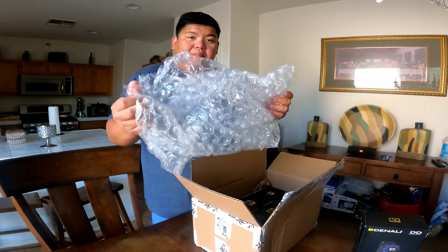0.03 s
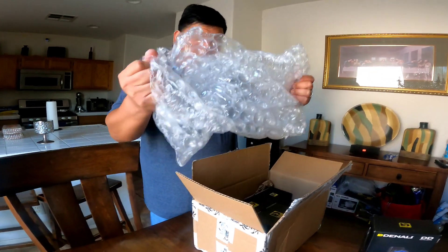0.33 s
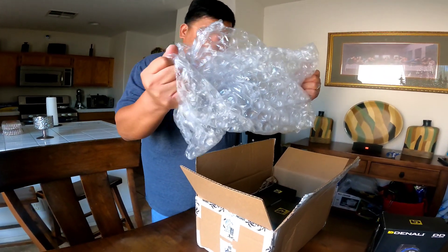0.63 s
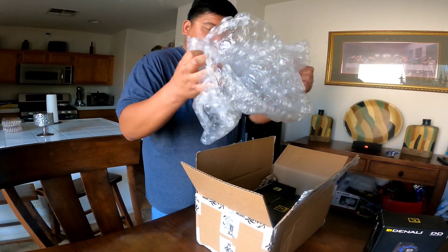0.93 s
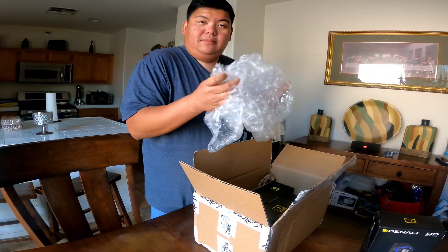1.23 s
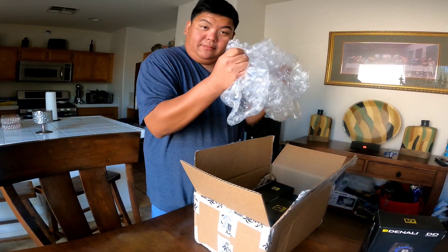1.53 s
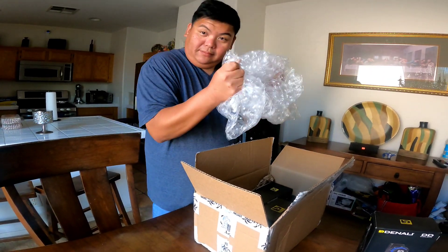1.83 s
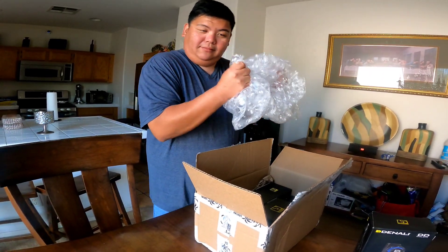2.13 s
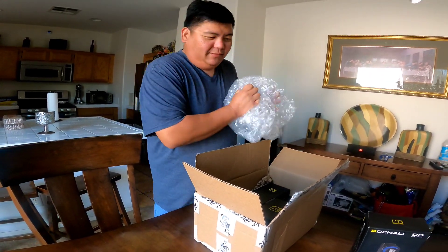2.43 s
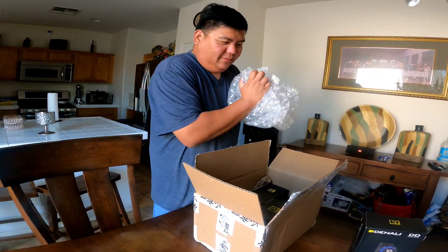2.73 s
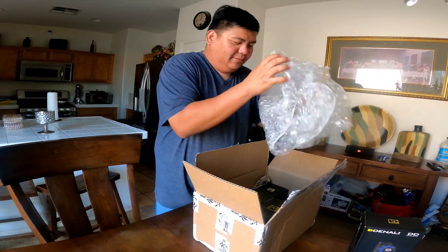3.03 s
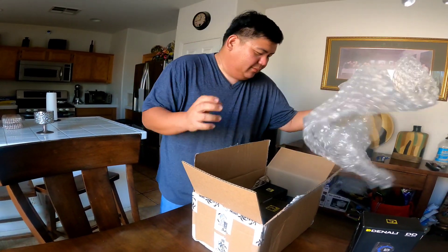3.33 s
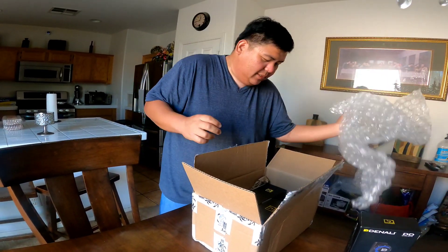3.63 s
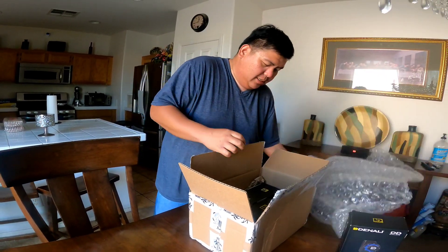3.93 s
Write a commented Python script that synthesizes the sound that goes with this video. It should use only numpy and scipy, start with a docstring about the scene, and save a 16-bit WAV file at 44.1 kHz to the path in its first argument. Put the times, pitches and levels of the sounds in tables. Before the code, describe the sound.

Sharp pops burst from bubble wrap as hands squeeze and twist the crinkling plastic.

```python
"""A live dining room: a sheet of bubble wrap is wrung by hand close to an almost mono microphone.
Cells burst in clusters: each is a pressure snap that rings the air pockets of the bundle, and the loud
ones overload the microphone. Between them the film rustles and ticks; near the end it slips through
the hand. Room tone and stirred air lie underneath."""
import sys
import numpy as np
from scipy import signal
from scipy.fft import rfft, irfft
from scipy.io import wavfile

SR = 44100
rng = np.random.default_rng(int(sys.argv[2]) if len(sys.argv) > 2 else 0)


def dump(signal):
    """Clip the signal to [-1, 1] and save it as 16-bit WAV at the path in sys.argv[1]."""
    limited = np.clip(np.atleast_2d(signal).T, -1, 1)
    pcm = np.round(limited * 32767).astype(np.int16)
    wavfile.write(sys.argv[1], SR, pcm)


N = 176400
TIME = np.arange(N) / SR
SHORT = TIME[:SR // 25]  # 40 ms, one transient

# film rubbing on film: (frequency [Hz], relative density [dB])
FILM_SPECTRUM = [(60, -6.5), (150, -13.5), (300, -10.5), (550, -1.5), (1100, -0.5), (2500, -1.5),
                 (4900, -4.5), (6500, -9.5), (9300, -7), (12000, -15), (16000, -21)]


def from_db(db):
    """Decibels to gain."""
    return 10 ** (np.asarray(db) / 20)


def rms_one(x):
    """Scale to unit rms."""
    return x / np.sqrt(np.mean(x ** 2) + 1e-20)


def cut(x, hz, kind, order=2):
    """Butterworth filter."""
    return signal.sosfilt(signal.butter(order, np.clip(hz, 10, .47 * SR), kind, fs=SR, output="sos"), x)


def resonate(x, hz, q):
    """Two-pole band-pass, peak gain 1."""
    w = 2 * np.pi * min(hz, SR / 3) / SR
    k = np.sin(w) / (2 * q)
    return signal.lfilter([k, 0, -k], [1 + k, -2 * np.cos(w), 1 - k], x)


def colour(x, spectrum):
    """Shape by (Hz, dB) points; rms 1."""
    hz, db = np.transpose(spectrum)
    bins_hz = np.maximum(np.fft.rfftfreq(N, 1 / SR), 1e-3)
    gain = from_db(np.interp(np.log(bins_hz), np.log(hz), db))
    return rms_one(irfft(rfft(x) * gain, N))


def add(track, at_s, sound):
    """Mix a sound in at a time."""
    i = max(int(at_s * SR), 0)
    track[i:i + len(sound)] += sound[:max(N - i, 0)]


def swell(peak_s, rise_s, fall_s):
    """Exponential rise and fall; peak 1."""
    return np.exp(-np.minimum(np.maximum((peak_s - TIME) / rise_s, (TIME - peak_s) / fall_s), 20))


def background():
    """Steady room tone, and air stirred against the microphone."""
    # room tone: (frequency [Hz], relative density [dB])
    tone_spectrum = [(25, -0.5), (40, -10.5), (58, 8), (75, -16), (120, -8.5), (250, -17), (600, -11.5),
                     (2000, -21.5), (5300, -22), (16000, -42)]
    # stirred air: (frequency [Hz], relative density [dB])
    air_spectrum = [(2, 1.5), (7, 0.5), (15, -2.5), (24, -13), (40, -33.5), (100, -45), (400, -83.5)]
    # strength of the stirred air: (time [s], level [dB])
    air_levels = [(0, -34.5), (.4, -34), (.8, -44), (1.3, -44), (1.8, -39), (2.2, -48), (2.9, -35.5),
                  (3.3, -40.5), (3.6, -35.5), (3.9, -31)]
    tone_db, air_db = -54.5, np.interp(TIME, *np.transpose(air_levels))
    tone = colour(rng.standard_normal(N), tone_spectrum)
    air = colour(rng.standard_normal(N), air_spectrum)
    return from_db(tone_db) * tone + from_db(air_db) * air


def in_room(x):
    """Two echoes, dense early reflections and a tail dying band by band; a new spot on each call."""
    # diffuse field: (frequency [Hz], level [dB], T60 [s])
    reverb_bands = [(81, -2, .35), (249.3, 3, 0.35), (600, -6, 0.32), (1300, -9.5, 0.44),
                    (2500, -12.5, 0.38), (5000, -17.5, 0.46), (9000, -9.5, 0.37), (16100, -9, .22)]
    # nearby surfaces: (delay [s], level [dB])
    echoes = [(.0063, -23.5), (0.0135, -24.5)]
    build_s, early_db, early_s = 0.0034, 1, 0.0093
    t, edges_hz = TIME[:3 * SR // 4], np.geomspace(50, 18000, 15)
    hz, db, t60_s = np.transpose(reverb_bands)
    white, bins_hz = rfft(rng.standard_normal(len(t))), np.fft.rfftfreq(len(t), 1 / SR)
    response = np.zeros(len(t))
    for low, high in zip(edges_hz, edges_hz[1:]):
        log_centre = np.log(low * high) / 2
        band_t60_s = np.interp(log_centre, np.log(hz), t60_s)
        band_db = np.interp(log_centre, np.log(hz), db)
        band = irfft(white * ((bins_hz >= low) & (bins_hz < high)), len(t))
        energy_norm = np.sqrt(2 * np.log(1000) / (band_t60_s * SR))
        response += band * from_db(band_db - 60 * t / band_t60_s) * energy_norm
    response *= 1 - np.exp(-(t / build_s) ** 2)
    response *= 1 + from_db(early_db) * np.exp(-t / early_s)
    for delay_s, echo_db in echoes:
        response[int(delay_s * SR)] += from_db(echo_db)
    return signal.fftconvolve(x, response)


def crinkles(spectrum, spread_db=3, rate_per_s=4500):
    """Dense tiny clicks of uneven size; rms 1."""
    sizes = from_db(spread_db * np.minimum(rng.exponential(1, N), 5)) * rng.choice([-1, 1], N)
    return colour(sizes * (rng.random(N) < rate_per_s / SR), spectrum)


def rustle():
    """Film crinkles on film as the hands work it; the level flutters."""
    # strength of the rubbing: (time [s], relative level [dB])
    rub_levels = [(0, -38), (.15, -41.5), (.28, -41), (.45, -66), (.58, -46.5), (.8, -42.5), (.96, -49),
                  (1.02, -42), (1.25, -39), (1.5, -39), (1.7, -40), (1.9, -52), (2.14, -51.5), (2.22, -44),
                  (2.38, -42.5), (2.47, -37.5), (2.64, -38), (2.71, -36.5), (2.81, -39.5), (3.0, -41),
                  (3.1, -41.5), (3.3, -47), (3.55, -48), (3.68, -59), (3.75, -51), (3.9, -59), (4, -47.5)]
    flutter_db = 1.46 * rms_one(cut(rng.standard_normal(N), 27.7, "low"))
    return from_db(np.interp(TIME, *np.transpose(rub_levels)) + flutter_db) * crinkles(FILM_SPECTRUM)


def slip():
    """The bundle slips through the hand: one quick swell of crinkles."""
    # sliding film: (frequency [Hz], relative density [dB])
    spectrum = [(50, -11.5), (110, 0.5), (250, 0), (480, 3.5), (900, 2), (2200, -3.5), (4500, -2.5),
                (9000, -11), (16000, -20)]
    envelope = from_db(-19.5) * swell(peak_s=2.886, rise_s=0.017, fall_s=0.018)
    return envelope * crinkles(spectrum, spread_db=2.5)


def squeezes():
    """Film friction through dull resonances of the air-filled bundle."""
    # squeezes of the bundle: (time [s], relative level [dB], pitch [Hz])
    grips = [(.002, -23.5, 600), (2.349, -35, 646), (2.476, -32.5, 630), (2.595, -42, 700),
             (2.759, -42, 1100), (2.773, -34.5, 380), (2.884, -27, 436), (3.542, -44, 900),
             (3.997, -50, 800)]
    out, friction = np.zeros(N), crinkles(FILM_SPECTRUM)
    for at_s, db, hz in grips:
        envelope = from_db(db) * swell(at_s, rise_s=0.0065, fall_s=0.013)
        out += envelope * rms_one(resonate(friction, hz, q=1.5))
    return out


def snap(hz, q, low_cut_hz=225, top_hz=6500):
    """A pressure impulse through a damped resonance; peak 1."""
    pulse = cut(resonate(-1. * (SHORT == 0), hz, q), low_cut_hz, "high")
    pulse = cut(pulse, max(top_hz, 2 * hz), "low")
    return pulse / np.abs(pulse).max()


def crackle(hz, q, t60_s):
    """A short noise of film, dying away in the folds."""
    return rms_one(resonate(rng.standard_normal(len(SHORT)), hz, q)) * from_db(-60 * SHORT / t60_s)


def ticks():
    """Small ticks, each a snap and a crackle."""
    # creases snapping over, and two short echoes off a nearby surface (0.096 s, 0.622 s):
    # (time [s], level [dB], pitch [Hz])
    events = [(0.0141, -14, 1760), (0.0334, -15, 6500), (0.055, -21, 2500), (0.0816, -9.5, 2700),
              (.0957, -17.5, 5000), (.6222, -14, 3000), (0.9882, -26, 7140), (1.417, -25, 2980),
              (1.462, -21.5, 2500), (1.5683, 0, 2200), (2.302, -36, 2800), (2.472, -33, 2160),
              (2.692, -28, 3970), (2.707, -24, 3980), (2.867, -23, 2500), (2.8762, -18, 2200),
              (2.8851, -11, 1500), (2.9, -13, 2950), (3.41, -36, 9000), (3.546, -36.5, 3000),
              (3.664, -38, 7000), (3.713, -32, 6500), (3.719, -34, 5900)]
    out = np.zeros(N)
    for at_s, db, hz in events:
        tick = snap(hz, q=0.75) + from_db(-8) * crackle(hz, q=0.75, t60_s=0.0082)
        add(out, at_s, from_db(db) * tick)
    return out


def pops():
    """Cells burst: a snap, two ringing pockets, tearing film, a puff of air. Returns (direct, reverb)."""
    # bursting cells: (time [s], level before overload [dB], snap [Hz], lower pocket [Hz],
    # upper pocket [Hz], ring [dB], tear [dB], tear [Hz], puff [dB], room [dB], sizzle [dB], sizzle [Hz])
    cells = [(0.293, 14.5, 1390, 950, 2080, -25.5, -26, 3500, -26, -5, -3, 5460),
             (0.3722, 19, 1050, 1290, 1526, -11.5, -27.5, 3320, -15, -8, -25, 2300),
             (0.4166, 16.5, 1150, 950, 1230, -18.5, -30, 3300, -19, -7.5, -38, 3500),
             (0.4258, 11.5, 1300, 930, 1620, -17.5, -32, 2800, -23.5, -5, -28, 2200),
             (0.6085, -4.5, 1300, 720, 1166, -0.5, -10, 2360, -25, 1, -8, 2400),
             (0.6718, 10, 1650, 720, 1360, -8, -20, 2500, -26.5, -3, -7.5, 2200),
             (1.5231, 9, 940, 860, 1250, -11, -23, 7100, -25.5, 0, -2.5, 7500),
             (1.5527, 0.5, 1500, 500, 940, 0, -22, 3500, -12.5, -2, -13, 8000),
             (1.5624, 9.5, 1300, 850, 1890, -12, -27, 3500, -19.5, 2.5, -13, 3500),
             (1.5711, 8, 1300, 1020, 1300, -20, -38, 3000, -17, 1.5, -15, 3000),
             (1.5715, 9, 990, 820, 1020, -6, -37, 3500, -22, -5.5, -13, 3000),
             (1.6207, 11, 1100, 1060, 1530, -17, -34.5, 3000, -26.5, -0.5, -22, 2500),
             (1.6636, -2, 980, 800, 1270, 5.5, -12.5, 2600, -11.5, -1, -15, 2000),
             (1.9446, 16.5, 1510, 805, 1820, -29.5, -26, 3870, -24, -4.5, -6, 4440)]
    pocket_build_s, pocket_t60_s = 0.00093, 0.011
    puff_s, puff_room_db = 0.00055, -15.5
    ring = (1 - np.exp(-SHORT / pocket_build_s)) * from_db(-60 * SHORT / pocket_t60_s)
    puff = -(SHORT / puff_s) ** 2 * np.exp(2 - 2 * SHORT / puff_s)
    direct, reverb = np.zeros(N), np.zeros(N)
    for (at_s, db, snap_hz, lower_hz, upper_hz, ring_db,
         tear_db, tear_hz, puff_db, room_db, sizzle_db, sizzle_hz) in cells:
        pockets = ring * (np.sin(2 * np.pi * lower_hz * SHORT) + np.sin(2 * np.pi * upper_hz * SHORT))
        body = snap(snap_hz, q=0.74) + from_db(ring_db) * pockets
        tear = from_db(tear_db) * crackle(tear_hz, q=1.1, t60_s=0.013)
        add(direct, at_s, from_db(db) * (body + tear + from_db(puff_db) * puff))
        sizzle = from_db(sizzle_db) * snap(sizzle_hz, q=3.5)  # aimed away from the microphone
        tail = in_room(body + sizzle + from_db(puff_db + puff_room_db) * puff)
        add(reverb, at_s, from_db(db + room_db) * tail)
    return direct, reverb


def scene():
    """Wrap, room and background; the channels differ slightly, in the phase of the diffuse sound."""
    bursts, burst_reverb = pops()
    ticking = ticks()
    film = rustle() + slip() + squeezes()
    handling_reverb = in_room(from_db(3) * ticking + from_db(-4) * film)[:N]
    diffuse = burst_reverb + from_db(-6) * film + handling_reverb + background()
    treble = cut(diffuse, 4000, "high", order=1)
    treble = cut(treble[::-1], 4000, "high", order=1)[::-1]  # reverse pass: zero phase
    side = signal.hilbert(from_db(-24) * treble + from_db(-35) * diffuse).imag  # 90 degree shift
    mid = bursts + ticking + diffuse
    return np.array([mid + side, mid - side])


def record(dry):
    """Microphone overload flattens the loud pops at full scale; a steep low-pass follows."""
    knee, cutoff_hz = 5, 16200
    clipped = dry / (1 + np.abs(dry) ** knee) ** (1 / knee)
    return signal.sosfiltfilt(signal.butter(20, cutoff_hz, fs=SR, output="sos"), clipped)


dry = scene()
out = record(dry)
dump(out)
```